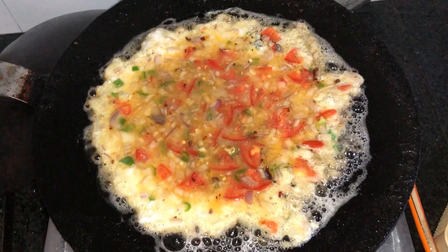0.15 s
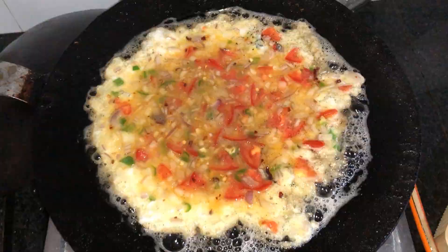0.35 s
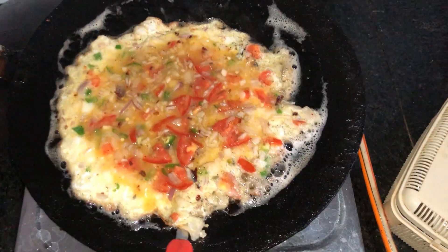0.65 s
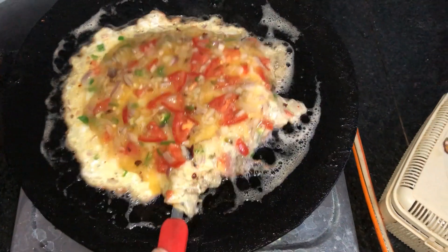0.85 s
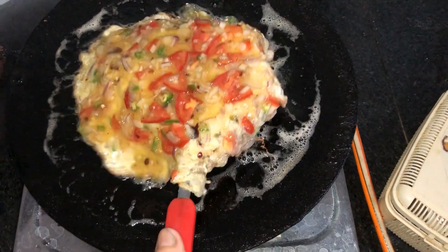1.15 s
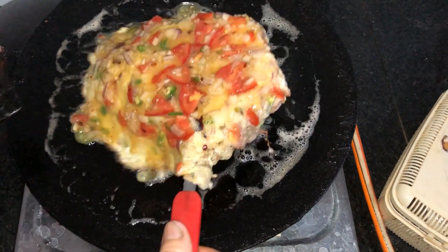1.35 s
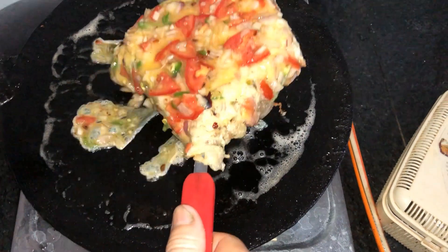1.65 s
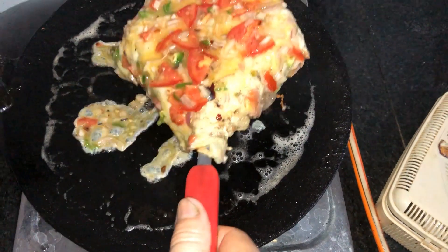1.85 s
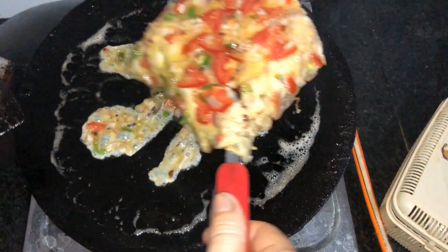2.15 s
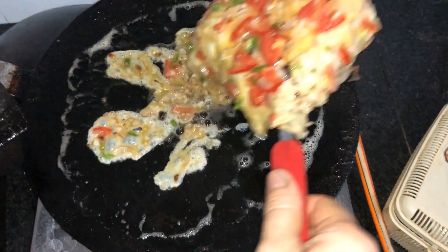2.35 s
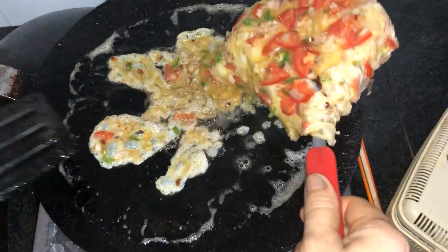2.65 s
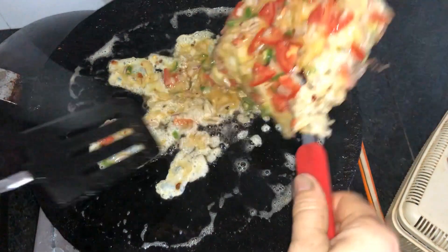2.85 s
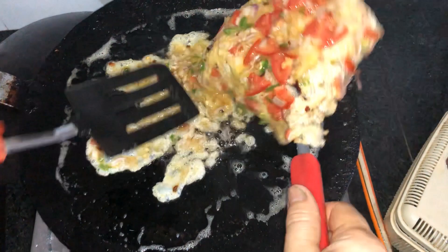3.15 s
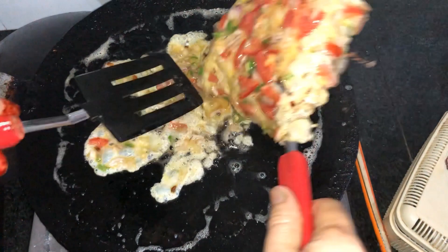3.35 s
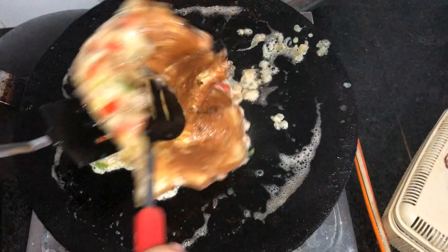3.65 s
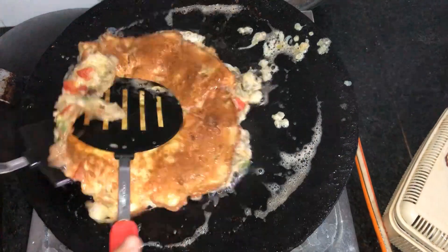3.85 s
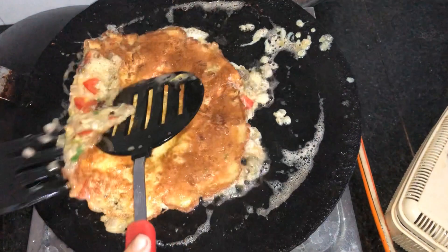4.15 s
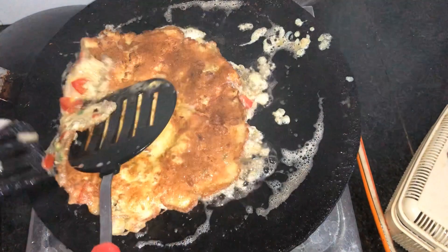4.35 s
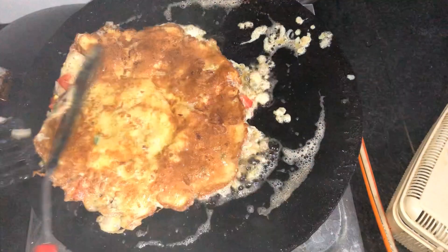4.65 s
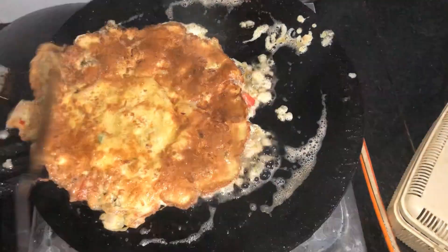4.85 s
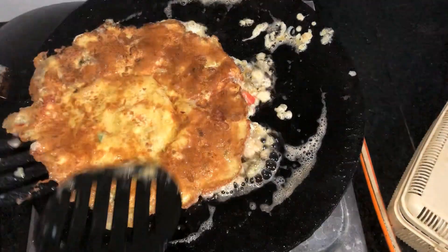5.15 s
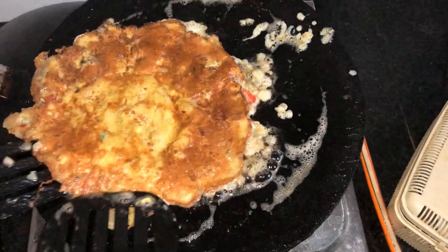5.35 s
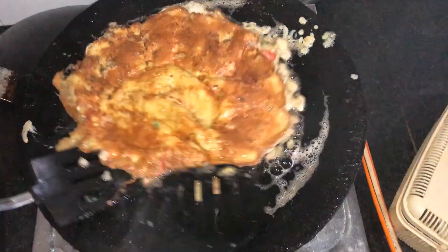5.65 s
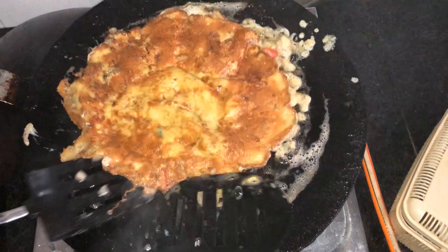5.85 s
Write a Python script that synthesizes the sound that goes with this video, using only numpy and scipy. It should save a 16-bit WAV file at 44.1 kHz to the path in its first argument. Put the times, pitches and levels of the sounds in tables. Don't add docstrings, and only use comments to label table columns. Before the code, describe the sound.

Close frying in a kitchen: light crackling pops and soft blade taps, then raw egg hits hot iron with sustained bright sizzling.

```python
import sys
import numpy as np
from scipy import signal
from scipy.fft import rfft, irfft
from scipy.io import wavfile
from scipy.ndimage import uniform_filter1d

SR = 44100
rng = np.random.default_rng(int(sys.argv[2]) if len(sys.argv) > 2 else 0)


def makeup_ratio(level_db):
    decades = np.asarray(level_db, float) / 20
    return 10 ** decades


def to_wav(s):
    ch = np.atleast_2d(s).T
    pcm = np.round(np.clip(ch, -1, 1) * 32767)
    wavfile.write(sys.argv[1], SR, pcm.astype(np.int16))


N = 264951

# time in [s], fizz level in [dB], roar of steam trapped under the egg in [dB re fizz],
# fine spray off the open oil in [dB re fizz].
FRYING = [(0.0, -49, -10, -7), (0.1, -51, -8, -11), (0.47, -51.5, -7, -12), (0.56, -45.5, -9, -3),
          (0.76, -41, -12, -11), (1.325, -42, -14.5, 2), (1.345, -32, -12.5, -11), (1.46, -36, -2, -4),
          (1.6, -32.5, -2, -6.5), (2.05, -34, -6, -5.5), (2.45, -32.5, -6, -3), (3.0, -32.5, -6, -4),
          (4.1, -31.5, -6.5, -4.5), (4.5, -32.5, -12, -4), (4.8, -30, -15, -3.5), (5.02, -35, -9, -2.5),
          (5.5, -32, -12.5, -9.5), (6.0, -34, -7, -6.5)]
FADE_S, SILENCE_S, BACK_S = 0.459, 0.496, 0.512
THIN_UNTIL_S = 1.33


def evened(x):
    return x / np.sqrt(np.mean(x ** 2) + 1e-20)


def read(points, hz):
    f, value = np.transpose(points)
    return np.interp(np.log(hz + 1), np.log(f + 1), value)


def add(mix, s, sound):
    part = mix[max(round(s * SR), 0):][:len(sound)]
    part += sound[:len(part)]


def fizz_level(s):
    return np.interp(s, *np.transpose(FRYING)[:2])


def peak(hz, centre_hz, width_hz):
    return 1 / (1 + (2 * (hz - centre_hz) / width_hz) ** 2)


def below(hz, corner_hz, steepness):
    return 1 / (1 + (hz / corner_hz) ** steepness)


def slow_noise(samples):
    return evened(uniform_filter1d(rng.standard_normal(N), samples))


def fuzzy_tone(hz, width):
    a, b = signal.lfilter([1], [1, -np.exp(-np.pi * width / SR)], rng.standard_normal((2, N)))
    turn = 2 * np.pi * hz * np.arange(N) / SR
    return evened(a * np.cos(turn) + b * np.sin(turn))


def burst(hz, cycles, rise):
    turns = np.arange(int(8 * cycles * SR / hz) + 8) * hz / SR
    ring = np.sin(2 * np.pi * (turns + rise * turns ** 2 / cycles))
    shape = turns * np.exp(-turns / (.4 * cycles)) * ring
    shape = shape - shape.mean()
    return shape / abs(shape).max()


def kitchen_tail(x, t60, wet_db):
    t = np.arange(int(.12 * SR)) / SR
    sparse = (rng.random(len(t)) < .15) * (t > .0008)
    taps = rng.standard_normal(len(t)) * makeup_ratio(-60 * t / t60) * sparse
    return x + makeup_ratio(wet_db) * signal.oaconvolve(x, taps / np.linalg.norm(taps))[:N]


def kitchen():
    # frequency in [Hz], density in [dB per Hz].
    rumble_colour = [(12, -48), (20, -23), (86, 0), (113, -1), (163, -2), (206, -7.5), (270, -4.5),
                     (323, -7.5), (394, -6.5), (586, -15), (677, -12), (783, -39), (1100, -39), (1500, -20),
                     (1950, -61), (3300, -120)]
    # time in [s], level in [dB].
    rumble_swell = [(0.0, -41.5), (0.12, -50.5), (0.53, -49.5), (1.12, -45), (2.0, -50.5), (3.2, -49),
                    (4.4, -48), (6.01, -50)]
    # frequency in [Hz], width in [Hz], level in [dB].
    fan_hum = [(96, 13.6, -52), (44, 7, -64.5)]
    # start in [s], length in [s], pitch in [Hz], level in [dB].
    far_drones = [(0, 0.38, 158.8, -45.5), (0, .12, 320, -58), (.64, 0.049, 308, -40),
                  (1.05, 0.31, 96, -46), (1.12, 0.27, 192.7, -46.5), (1.33, 0.2, 339, -43.5),
                  (1.42, 0.16, 163.5, -49), (1.9, 0.23, 408, -47.5), (2.2, 0.095, 437, -46)]
    t = np.arange(N) / SR
    hz = np.fft.rfftfreq(N, 1 / SR)
    out = evened(irfft(rfft(rng.standard_normal(N)) * makeup_ratio(read(rumble_colour, hz)), N))
    out = out * makeup_ratio(np.interp(t, *np.transpose(rumble_swell)) - 0.5)
    for hum_hz, width, db in fan_hum:
        out += makeup_ratio(db) * fuzzy_tone(hum_hz, width)
    for s, length, drone_hz, db in far_drones:
        u = t[:int(length * SR)]
        swell = signal.windows.tukey(len(u), .6)
        add(out, s, makeup_ratio(db - 1.5) * swell * np.sin(2 * np.pi * drone_hz * u))
    return out


def whistle():
    gusts = makeup_ratio(3 * slow_noise(700))
    return makeup_ratio(-61.5) * gusts * fuzzy_tone(5770, 110) * (np.arange(N) / SR < SILENCE_S)


def knocks():
    # time in [s], peak in [dB], pitch in [Hz].
    blade_knocks = [
        (0.898, -30, 404),
        (1.183, -34, 410),
        (1.393, -28.5, 610),
    ]
    out = np.zeros(N)
    for s, db, hz in blade_knocks:
        add(out, s, makeup_ratio(db - 1) * burst(hz, 1.5, 0))
    return out


def small_spits():
    per_s, low_hz, high_hz = 80, 4300, 11500
    slot = np.arange(0, THIN_UNTIL_S, 1 / per_s)
    place, size, pitch, length = rng.random((len(slot), 4)).T
    s = slot + place / per_s
    db = fizz_level(s) + 18 + 3 * (2 * size - 1)
    hz = low_hz + (high_hz - low_hz) * pitch ** 1.3
    hz = hz * np.where(s < SILENCE_S, 1.35, 1)
    cycles = .6 + 1.0 * length ** 2
    return list(zip(s, db, hz, cycles))


def spits():
    # time in [s], peak in [dB], pitch in [Hz], length in [cycles].
    thin_oil_spits = [(0.011, -15, 8360, 1), (0.1893, -21, 4540, 1.3), (0.2477, -24, 5700, 1.2),
                      (0.2657, -23.5, 7900, 0.79), (0.3456, -28, 6800, 3.2), (0.404, -31, 5960, 2.3),
                      (0.5278, -25, 4860, 0.76), (0.5547, -19, 5360, 0.67), (0.567, -15, 9000, 0.46),
                      (0.6996, -23, 6500, 1.5), (0.755, -17, 4950, 1.1), (0.7646, -7.5, 8100, 2.8),
                      (0.7807, -18, 5400, 0.56), (0.7863, -18, 10000, 1.4), (0.8764, -17, 9450, 0.76),
                      (0.8987, -7, 4300, 0.58), (0.95, -14.5, 4400, 1), (0.9851, -13, 7400, 0.69),
                      (0.9949, -2, 10800, 1.06), (1.0019, -18, 7200, 0.82), (1.0115, -16, 10900, 1.3),
                      (1.0288, -13, 6900, 0.42), (1.0416, -19, 8250, 0.65), (1.052, -16.5, 4270, 1.4),
                      (1.058, -17, 7900, 1.4), (1.082, -12.5, 9300, 0.82), (1.118, -15, 10600, 1.2),
                      (1.1826, -5, 9000, 0.75), (1.2327, -15.5, 7040, 1.02), (1.301, -16, 11000, 1.02)]
    # time in [s], peak in [dB], pitch in [Hz], length in [cycles].
    hot_pan_spits = [(1.3407, -7, 10300, 1), (1.4013, -13, 7840, 0.87), (1.407, -7.5, 10100, 0.91),
                     (1.529, -11, 8500, 2.5), (1.6074, -13, 5700, 1.02), (1.984, -13, 9800, 1.2),
                     (2.152, -14, 9300, 1.1), (2.3128, -10, 8400, 2.1), (2.8217, -7, 10400, 0.83),
                     (2.8726, -13, 7950, 2.9), (2.9361, -13, 7150, 2), (2.9854, -10, 7400, 2.1),
                     (3.0664, -3.5, 7500, 1.14), (3.126, -11, 6500, 0.58), (3.429, -15, 8200, 2.8),
                     (3.7917, -11, 9000, 2.1), (4.1884, -13, 6900, 0.75), (4.7433, -5, 10500, 1.6),
                     (4.9162, -3.5, 10400, 1.07), (4.935, -16, 9500, 1.1), (4.954, -11, 8200, 0.79),
                     (5.0017, -13.5, 9200, 1.9), (5.1017, -12, 8500, 1.5), (5.112, -12.5, 8400, 0.97),
                     (5.172, -14, 6200, 1.02), (5.3487, -12.5, 5960, 0.98), (5.4255, -12, 5500, 0.5),
                     (5.563, -6, 6150, 0.93), (5.6054, -9, 8000, 1), (5.887, -14, 3800, 1.4)]
    out, snap = np.zeros(N), burst(4500, 1.0, 0)
    rows = [*thin_oil_spits, *hot_pan_spits, *small_spits()]
    shreds = rng.standard_normal((len(rows), 60)) * (rng.random((len(rows), 60)) < .2)
    for (s, db, hz, cycles), shred in zip(rows, shreds):
        pop = burst(hz, np.clip(cycles, .5, 12), 0.05)
        ragged = np.clip(-db / 45, .12, .4)
        tearing = np.r_[1, ragged * shred * np.exp(-np.arange(len(shred)) / 30)]
        tearing = tearing / np.linalg.norm(tearing)
        add(out, s - abs(pop).argmax() / SR, makeup_ratio(db + 1.0) * np.convolve(pop, tearing))
        add(out, s - abs(snap).argmax() / SR, makeup_ratio(db - 13.5) * np.convolve(snap, tearing))
    out = signal.sosfilt(signal.butter(2, 1300, "high", fs=SR, output="sos"), out)
    return kitchen_tail(out, 0.025, -7.5)


def crackle():
    pops_per_s, spread_db, spread_cap = 4000, 3.5, 3.1
    clump = makeup_ratio(3.0 * slow_noise(300))
    size = makeup_ratio(spread_db * np.minimum(rng.exponential(1, N), spread_cap))
    size *= rng.random(N) < clump * pops_per_s / SR
    size *= rng.choice([-1., 1.], N)
    pitches = np.geomspace(1200, 15000, 30)
    kind, out = rng.integers(0, len(pitches), N), np.zeros(N)
    for k, hz in enumerate(pitches):
        pop = burst(hz, 0.66 + 4.3 * rng.random() ** 3, 0.17)
        pop = pop / np.linalg.norm(pop) * np.sqrt(hz)
        out += signal.oaconvolve(size * (kind == k), pop)[:N]
    z = rfft(kitchen_tail(out, 0.069, -8))
    power = uniform_filter1d(abs(z) ** 2, size=400)
    return evened(irfft(z / np.sqrt(power + 0.0014 * power.max()), N))


def fizz_colour(hz, t):
    # frequency in [Hz], density in [dB per Hz].
    fizz_spectrum = [(180, -26), (300, -13), (326, -27), (372, -9), (1020, -6.5), (1130, -6), (1550, -3.5),
                     (2020, -6.5), (2470, -3), (5940, -3), (8000, -1), (12700, -4.5), (15800, -8.5)]
    # frequency in [Hz], width in [Hz], gain in [dB].
    egg_pocket = [
        (1400, 170, 4.5),
        (2190, 220, 6),
    ]
    s, fizz_db, roar_db, spray_db = np.transpose(FRYING)
    hz = hz[:, None]
    patches = rng.standard_normal((len(hz), len(t)))
    patches = evened(uniform_filter1d(uniform_filter1d(patches, 14, 0), 40, 1))
    field_db = read(fizz_spectrum, hz) + 7.08 + 0.85 * patches + np.interp(t, s, fizz_db)

    low = below(hz, 1080, 8)
    roar = below(hz, 2900, 4) - low
    high = 1 / (1 + (11000 / (hz + 1)) ** 8)
    bubbling_db = np.select([t < SILENCE_S, t < THIN_UNTIL_S + .1], [-13, -20.5], -16)
    field_db += roar * (np.interp(t, s, roar_db) + 9.5)
    field_db += low * (bubbling_db + 17.5)
    field_db += high * (np.interp(t, s, spray_db) + 5.0)

    pocket_db = sum(db * peak(hz, pocket_hz, width) for pocket_hz, width, db in egg_pocket)
    field_db += pocket_db * np.interp(t, [1.38, 1.52, 1.72, 2.05], [0, 1, 1, 0])
    field_db += 2.8 * peak(hz, 7900, 1850) * np.interp(t, [2.2, 2.8, 3.3, 4.0], [0, 1, 1, 0])
    press_db = 5 - 1.5 * below(hz, 2100, 6)
    field_db += press_db * np.interp(t, [5.45, 5.55, 5.8, 5.92], [0, 1, 1, 0])
    return field_db


def sizzle():
    t = np.arange(N) / SR
    s, _, roar_db, _ = np.transpose(FRYING)
    share = .6 - 0.01 * (np.interp(t, s, roar_db) + 7)
    share = np.clip(share + 0.13 * (t < THIN_UNTIL_S), 0, 1)
    drive = np.sqrt(share) * crackle() + np.sqrt(1 - share) * rng.standard_normal(N)
    hz, frame_s, z = signal.stft(drive, SR, nperseg=256, noverlap=192)
    z = z * makeup_ratio(fizz_colour(hz, frame_s))
    return signal.istft(z, SR, nperseg=256, noverlap=192)[1][:N]


def scene():
    return (kitchen() + whistle() + knocks() + spits() + sizzle())[None]


def thin_out(x):
    # centre in [s], three surviving lines in [Hz], [Hz] and [Hz],
    # number of further survivors in [count].
    dropouts = [(0.6625, 2230, 4190, 6030, 4), (0.7265, 3640, 5080, 9670, 6), (0.812, 2510, 6130, 8450, 4),
                (0.94, 3010, 4110, 10120, 3), (2.028, 1650, 6920, 9060, 5), (2.348, 2630, 3110, 10490, 3),
                (2.433, 2750, 7310, 12900, 1), (2.7745, 3770, 7280, 12840, 8),
                (2.9025, 1040, 2830, 11780, 4), (3.265, 4540, 7090, 12910, 9),
                (3.4785, 7680, 8320, 9390, 1), (3.564, 1600, 2470, 3970, 2), (3.692, 1310, 3200, 4670, 3),
                (3.9905, 2450, 4670, 8240, 1), (4.1185, 1840, 2440, 4770, 2), (4.161, 3710, 4840, 6780, 2),
                (4.3745, 950, 8230, 10800, 2), (4.46, 2410, 3200, 4650, 3), (4.8225, 4330, 6320, 14170, 5),
                (4.972, 4300, 12650, 13920, 1)]
    frame_s = 2048 / 48000
    out, t = x.copy(), np.arange(int(frame_s * SR)) / SR
    window, hz = np.sin(np.pi * t / frame_s), np.fft.rfftfreq(len(t), 1 / SR)
    left = np.sqrt(1 - .995 * window ** 1.7)
    for s, *lines_hz, more in dropouts:
        start = round((s - frame_s / 2) * SR)
        frame = x[start:][:len(t)]
        treble = abs(rfft(frame * window))[::2] * (hz[::2] > 5800)
        loudest_hz = hz[np.argsort(-treble)[:more] * 2]
        phase = 2 * np.pi * rng.random(len(lines_hz) + more)[:, None]
        tones = np.sin(2 * np.pi * np.r_[lines_hz, loudest_hz][:, None] * t + phase)
        tones = tones[:3].sum(0) + makeup_ratio(0.5) * tones[3:].sum(0)
        level = makeup_ratio(fizz_level(s) - 6.5)
        add(out, start / SR, (left - 1) * frame + level * window * tones)
    return out


def roll_off(x):
    return signal.sosfilt(signal.butter(12, 17000, fs=SR, output="sos"), x)


def record(dry):
    t = np.arange(N) / SR
    fade = np.interp(t, [FADE_S, SILENCE_S - .006, SILENCE_S + .004, BACK_S, BACK_S + 0.02],
                     [0.9, .015, .015, 0.47, 0.95])
    x = signal.sosfilt(signal.butter(2, 45, "high", fs=SR, output="sos"), dry[0])
    x = thin_out(x * fade ** 1.2)
    treble_limit = signal.firwin(401, 15750, window=("kaiser", 3.5), fs=SR)
    x = signal.oaconvolve(x, treble_limit, "same")
    return roll_off(x[None])


dry = scene()
out = record(dry)
to_wav(out)
```